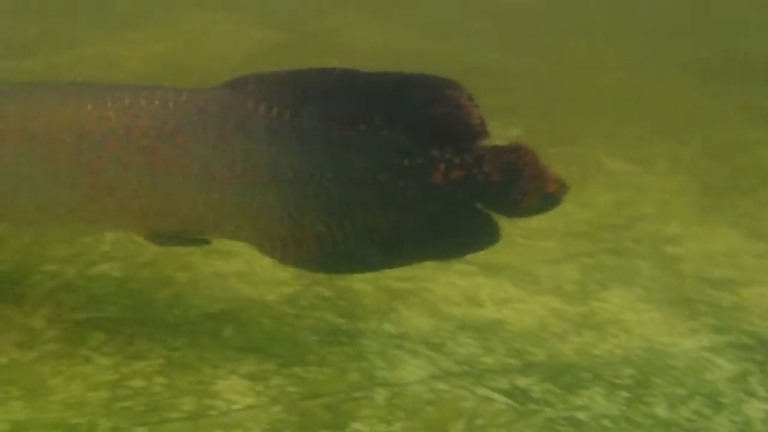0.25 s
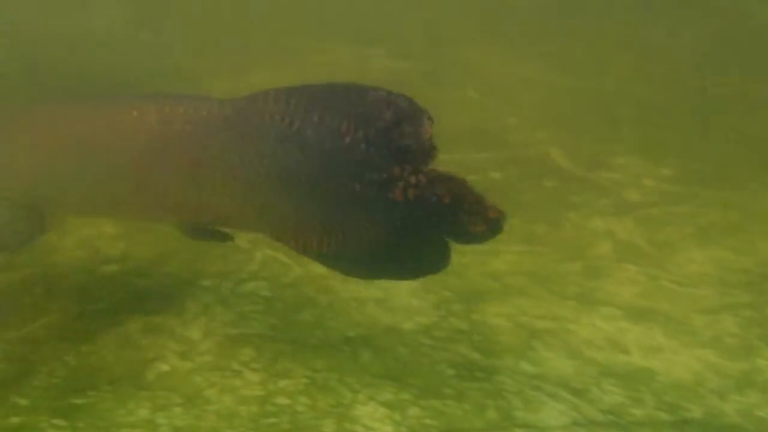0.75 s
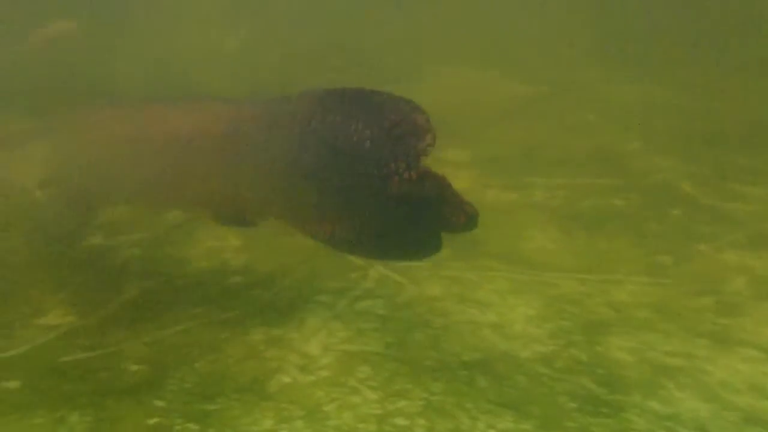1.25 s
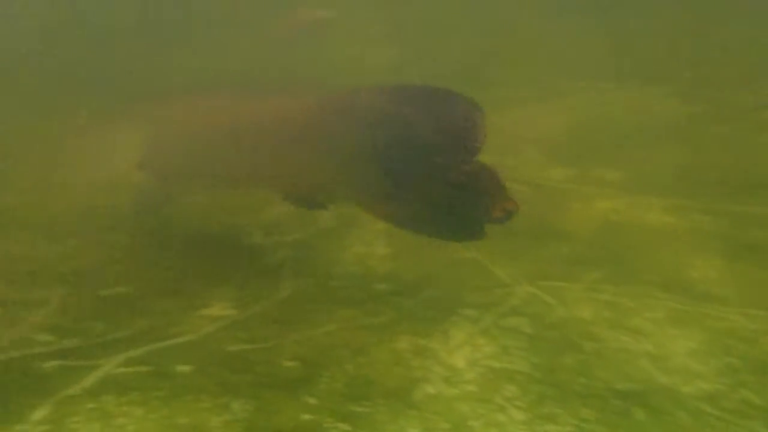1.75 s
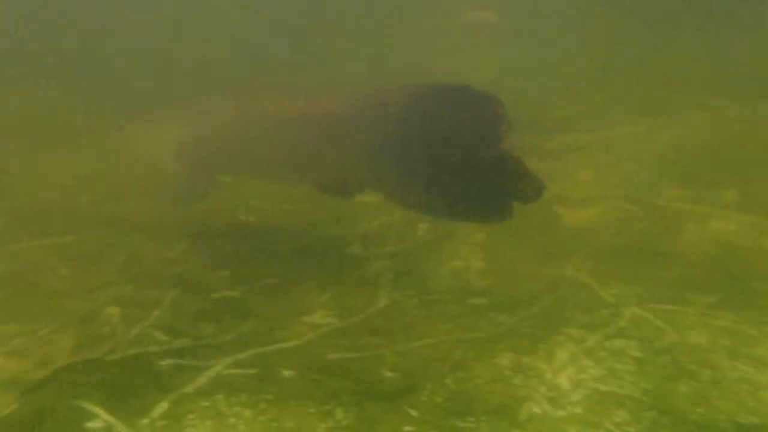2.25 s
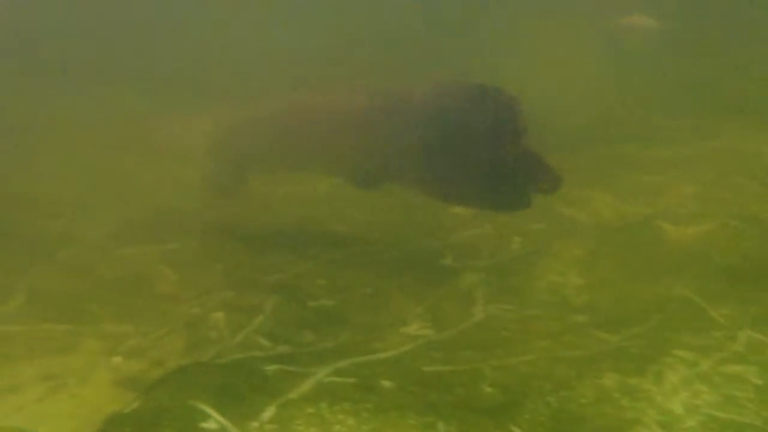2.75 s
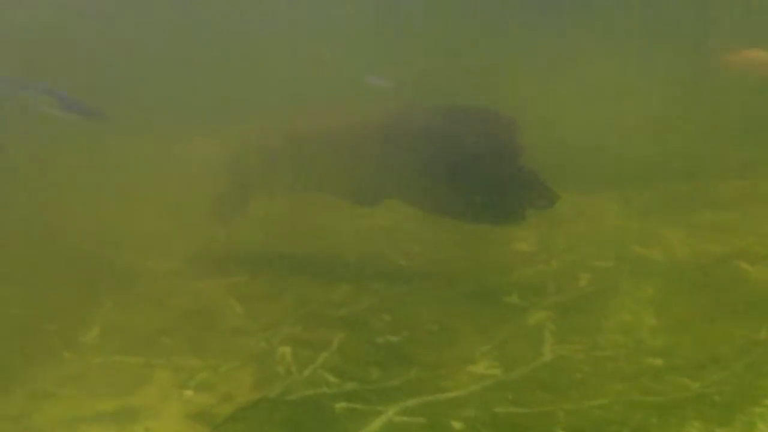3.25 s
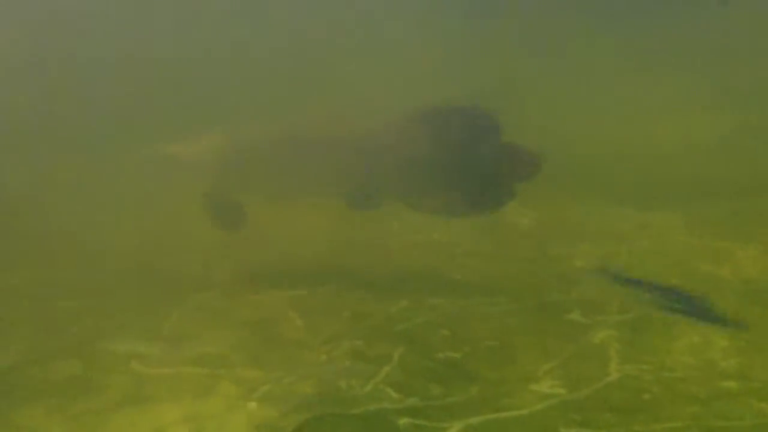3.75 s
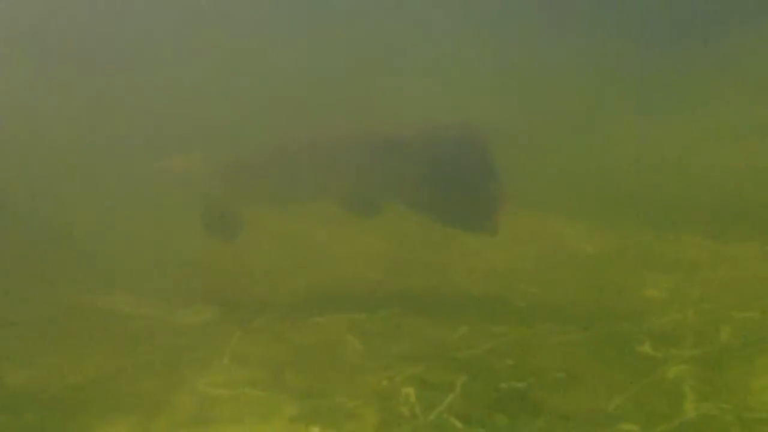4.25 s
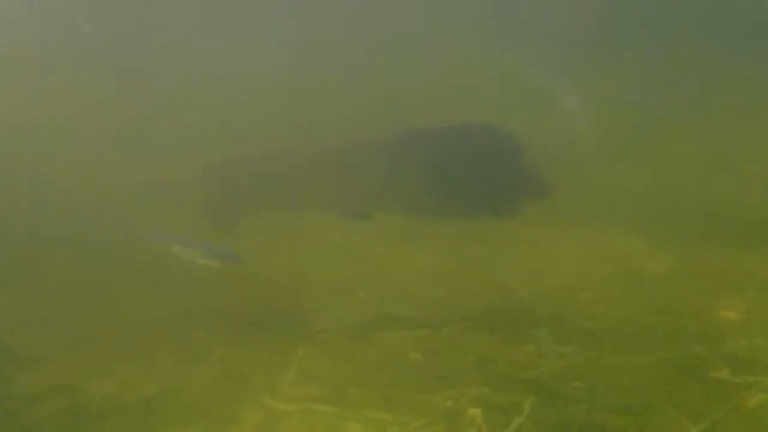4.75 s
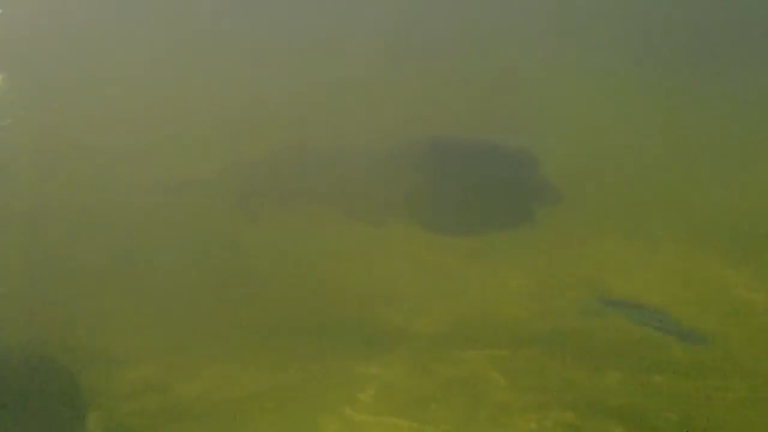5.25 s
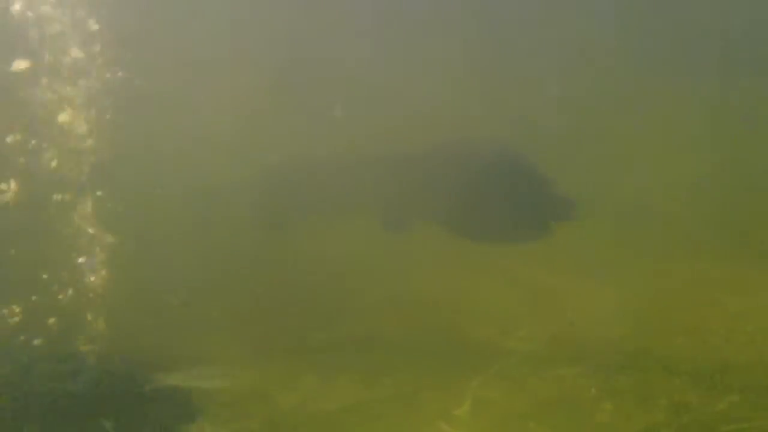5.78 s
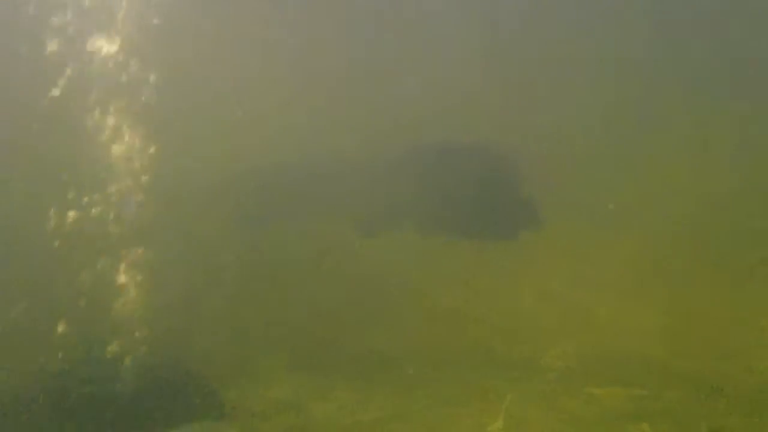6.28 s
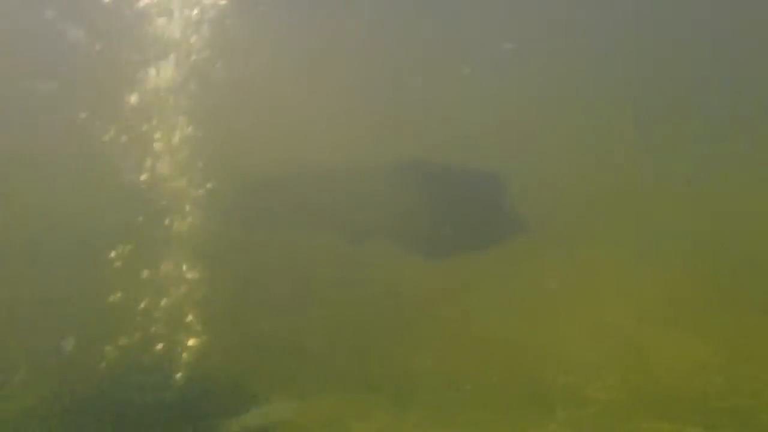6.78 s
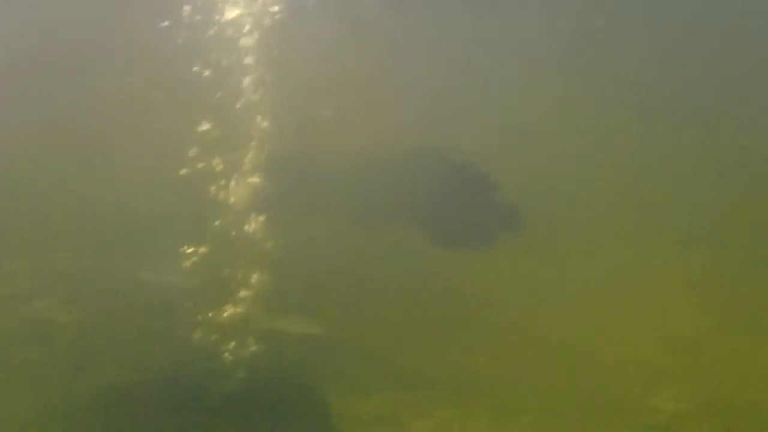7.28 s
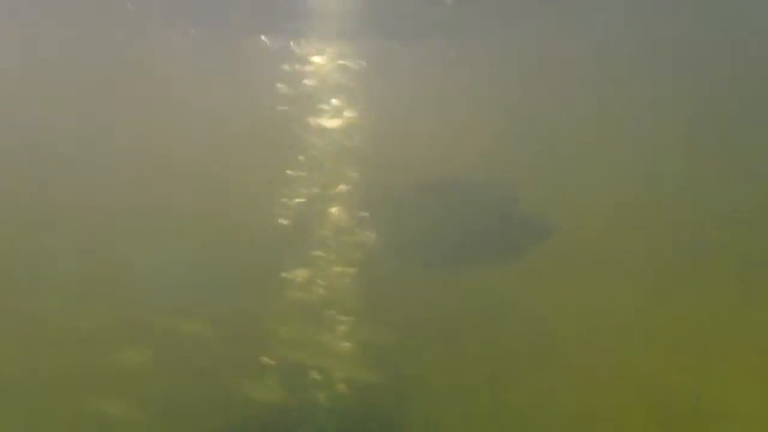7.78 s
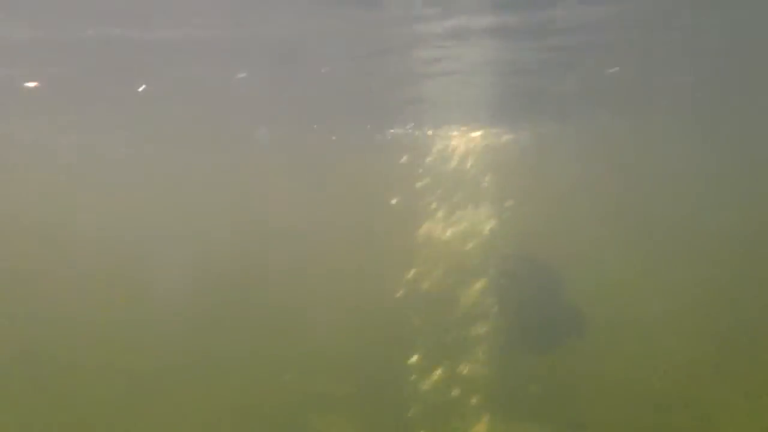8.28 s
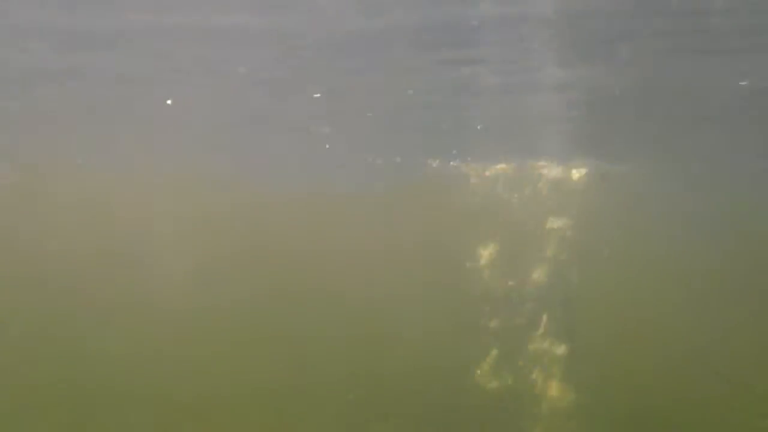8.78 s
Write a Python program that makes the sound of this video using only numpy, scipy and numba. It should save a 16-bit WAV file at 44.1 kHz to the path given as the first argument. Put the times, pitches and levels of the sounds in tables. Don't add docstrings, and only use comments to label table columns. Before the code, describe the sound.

Rapid glassy bubbling and popping heard inside a submerged housing, with a short opening hum, soft rumbling flow and occasional hard handling knocks.

```python
import sys
import numpy as np
from scipy import signal
from scipy.fft import rfft, irfft, next_fast_len
from scipy.io import wavfile
from scipy.ndimage import uniform_filter1d
from numba import njit

SR = 44100
rng = np.random.default_rng(int(sys.argv[2]) if len(sys.argv) > 2 else 0)


def boost(x):
    u = np.asarray(x, float) / 20
    return 10 ** u


def to_wav(sig):
    pcm = np.clip(np.atleast_2d(sig), -1, 1) * 32767
    pcm = np.round(pcm).astype(np.int16)
    wavfile.write(sys.argv[1], SR, pcm.T)


N = 398223
T = np.arange(N) / SR

# (centre [Hz], width [Hz], lift [dB])
SHELL_MODES = [(1191.6, 41.7, 19), (1392, 117, 13.5), (1584, 135, 12), (2070, 36, 8), (2400, 86, 5.5),
               (3700, 650, 5), (5890, 450, 16)]
# (pitch [Hz], level [dB])
BUBBLE_SIZES = [(800, -35), (1000, -16), (1130, -12), (1400, -4.5), (1700, -8), (2000, -15), (3000, -20.5),
                (5000, -29), (6500, -35), (7500, -50)]
# (time [s], bubble stream level [dB], rumble level [dB])
DRIFT = [(0.0, -19.5, -14), (0.63, -21, -25), (1.05, -21, -27.5), (1.41, -21.5, -25.5), (3.32, -20, -26.5),
         (3.67, -22.5, -29), (4.2, -21.5, -26), (4.55, -25.5, -29), (5.53, -21.5, -28),
         (8.78, -25.5, -24.5), (9.03, -23, -16)]
# (frequency [Hz], density [dB per Hz])
FLOW_SPECTRUM = [(15, -1), (25, 3), (150, 1.5), (230, -11), (400, -22.5), (700, -26.5), (1000, -27),
                 (2500, -38), (6000, -41.5), (7500, -48), (13000, -55)]
# (start [s], end [s], level [dB])
TOUCHES = [
    (0, 0.922, -22),
    (3.84, 3.98, -26),
    (4.12, 4.44, -27),
]
# (multiple of the root [1], level [dB])
HUM_OVERTONES = [(1, 2), (2, -8.5), (3, -10.5), (4, -14), (7, -24.5)]
# (frequency [Hz], level [dB rms])
WHINE_TONES = [(8031, -76), (8091, -72), (8152, -63), (8212, -66), (8273, -74), (8333, -76)]
# (time [s], level [dB], pitch [Hz], length [s])
BIG_BURSTS = [(0.013, -8, 1207, 0.01), (0.087, -17.5, 1230, 0.0081), (0.488, -15, 1383, 0.00286),
              (0.566, -21, 1225, 0.006), (0.727, -8, 1170, 0.0068), (0.748, -13.5, 1164, 0.007),
              (1.059, -19, 1249, 0.016), (1.371, -13, 1298, 0.0089), (1.402, -10.5, 1213, 0.0089),
              (1.647, -16.5, 1230, 0.008), (1.863, -8, 1182, 0.02), (2.699, -11.5, 1315, 0.024),
              (2.992, -19, 1044, 0.008), (3.214, -8.5, 1186, 0.015), (3.501, -2.5, 1170, 0.016),
              (3.55, -11.5, 1123, 0.014), (3.633, -5.5, 1184, 0.0065), (4.109, -11.5, 1200, 0.007),
              (6.023, -11, 1156, 0.005), (6.104, -2, 1195, 0.024), (6.279, -12, 1160, 0.007),
              (6.333, -11, 1130, 0.0039), (6.771, -15, 1236, 0.018), (6.938, -7, 1170, 0.0067),
              (6.992, -16.5, 1208, 0.011), (7.092, -11.5, 1224, 0.013), (7.196, -10, 1154, 0.017),
              (7.795, -8, 1188, 0.01), (8.184, -10, 1185, 0.01), (8.622, -12.5, 1193, 0.009)]
# (time [s], level [dB], pitch [Hz])
MIDDLE_BURSTS = [(0.871, -16, 1386), (0.889, -15.5, 1484), (1.444, -10, 1657), (1.58, -16, 1490),
                 (1.74, -14, 1302), (1.976, -18, 1636), (2.072, -7, 1625), (2.176, -9.5, 1424),
                 (2.388, -11, 1625), (8.863, -14.5, 1540), (2.57, -14.5, 1630), (2.662, -9.5, 1340),
                 (2.718, -9.5, 1490), (2.824, -12.5, 1610), (2.939, -13, 1647), (3.176, -11, 1560),
                 (3.252, -13, 1610), (4.4, -13, 1386), (4.787, -10.5, 1514), (4.802, -9, 1530),
                 (4.895, -10.5, 1760), (5.238, -12.5, 1670), (5.486, -12, 1350), (6.363, -10.5, 1328),
                 (6.583, -10.5, 1362), (7.405, -11, 1520), (7.69, -9.5, 1387), (8.113, -12.5, 1440),
                 (8.465, -15, 1440), (8.651, -10.5, 1360)]
# (time [s], level [dB], pitch [Hz])
SMALL_BURSTS = [(0.183, -20, 2070), (0.228, -27, 2400), (0.258, -22, 2170), (1.145, -17, 2120),
                (1.266, -15.5, 2020), (1.268, -21, 2850), (1.682, -17.5, 2400), (1.925, -28.5, 2770),
                (2.107, -16, 2070), (2.192, -22, 2050), (2.724, -18.5, 2100), (3.097, -20, 2020),
                (3.226, -14, 1884), (3.643, -25, 2310), (3.92, -21.5, 2720), (4.053, -21, 2400),
                (4.082, -12.5, 2535), (4.132, -25, 2050), (4.349, -23, 2180), (4.455, -28, 1890),
                (4.966, -20.5, 2190), (5.23, -29.5, 2770), (5.452, -30.5, 2310), (5.651, -23, 2100),
                (6.535, -28, 2720), (6.62, -14, 1760), (6.783, -23.5, 2420), (7.296, -26, 2150),
                (7.689, -23.5, 2400), (7.974, -20, 1770)]
# (time [s], level [dB], pitch [Hz])
TINY_BURSTS = [(0.544, -29, 3950), (1.014, -35, 6350), (1.749, -34.5, 4560), (1.852, -19.5, 6180),
               (2.108, -24, 5960), (2.113, -26.5, 3200), (2.255, -24, 3300), (2.355, -30, 3960),
               (2.519, -27.5, 2970), (3.995, -28, 6380), (4.033, -27, 4050), (4.439, -27.5, 5900),
               (4.632, -29, 6220), (4.64, -28.5, 4200), (4.987, -29, 6080), (5.058, -28.5, 3340),
               (5.199, -30.5, 5600), (5.323, -24.5, 4770), (5.876, -25.5, 3620), (5.974, -25, 3370),
               (6.197, -25, 3400), (6.709, -27, 3430), (6.904, -32, 6040), (7.186, -31, 3360),
               (7.367, -28, 3480), (7.848, -27, 3680), (8.417, -21, 4720), (8.46, -24, 6110),
               (8.484, -28, 3450), (8.857, -19.5, 3610)]
# (time [s], ring level [dB], thud level [dB], crack level [dB])
TICKS = [
    (.9358, 5, -5, -15),
    (1.5805, -5, -26, -34),
    (4.302, -2, -30, -30),
    (7.6006, 6, -3, -1),
    (8.9194, -4, 3, -18),
]
# (time [s], peak level [dB], pitch [Hz])
BUMPS = [(1.132, -21, 202), (2.056, -35, 313), (6.478, -32, 417), (2.38, -28, 264), (2.942, -28, 293),
         (3.37, -31, 301), (3.819, -23.5, 300), (4.738, -28, 690), (5.157, -19, 328), (5.191, -22.5, 318),
         (5.611, -27, 200), (5.646, -25, 261), (5.882, -34, 301), (5.967, -24.5, 272), (6.207, -30, 310),
         (6.348, -32, 299), (7.001, -27, 297), (7.338, -29, 242), (6.537, -27, 300), (7.528, -28.5, 378),
         (7.552, -22.5, 207), (7.81, -26.5, 320), (7.868, -21, 258), (7.992, -35, 355), (8.627, -35, 296),
         (8.684, -31, 285), (8.729, -25, 304), (8.773, -20.5, 340), (8.929, -18, 323), (8.975, -26, 200)]
# (start [s], end [s], level [dB])
RUBS = [
    (5.141, 5.31, -35),
    (7.3, 7.58, -36),
    (8.0, 8.25, -35),
    (8.65, 8.81, -28),
    (2.8, 2.9, -40),
]
# (time [s], gain [dB])
DUCKS = [(0.037, -7.5), (0.113, -7.5), (.3, -6.5), (0.359, -9), (.45, -8.5), (0.619, -8.5), (0.748, -11),
         (0.819, -10), (0.892, -7.5), (0.938, -14.5), (1.29, -8.5), (1.88, -5.5), (2.47, -8.5), (2.722, -6),
         (2.971, -9), (3.251, -6.5), (4.116, -4), (4.152, -5), (4.307, -7.5), (4.412, -2), (4.902, -7.5),
         (5.592, -3.5), (6.117, -3), (6.339, -4), (6.592, -11.5), (6.805, -0.5), (7.128, -6), (7.231, -6),
         (7.602, -13), (8.884, -8.5)]


def level(x, db):
    return x * boost(db) / np.sqrt(np.mean(x ** 2))


def curve(points, hz):
    f, db = np.transpose(points)
    return np.interp(np.log(hz), np.log(f), db)


def resonance(hz, centre_hz, width):
    return 1 / (1 + 1j * (hz ** 2 - centre_hz ** 2) / (hz * width))


def filtered(x, response):
    size = next_fast_len(N + SR)
    hz = np.maximum(np.arange(size // 2 + 1) * SR / size, 1.)
    return irfft(rfft(x, size) * response(hz), size)[:N]


def walk(rate):
    hold = int(SR / rate)
    steps = np.repeat(rng.standard_normal(N // hold + 1), hold)
    return 1.3 * uniform_filter1d(uniform_filter1d(steps, hold), hold)[:N]


@njit
def ring(s, hz, size, t60, rise, glide):
    out = np.zeros(N)
    for k in range(len(s)):
        start, phase = int(s[k] * SR), 0.
        for i in range(min(int(t60[k] * SR), N - start)):
            t = i / SR
            phase += 2 * np.pi * hz[k] * (1 + glide * t / t60[k]) / SR
            envelope = (1 - np.exp(-t / rise)) * np.exp(-6.907755 * t / t60[k])
            out[start + i] += size[k] * envelope * np.sin(phase)
    return out


def housing(hz):
    return 1 + sum((boost(db) - 1) * resonance(hz, f, w) for f, w, db in SHELL_MODES)


def before_gain(s, db):
    return db - np.interp(s, T, limiter_db())


def bubbles(s, db, hz, length, t60, rise, spread, fade_db, count):
    late, detune = np.moveaxis(rng.random((len(s), count, 2)), 2, 0)
    order = np.arange(count)
    follows = order > 0
    start = s[:, None] + np.clip(length, 0, .06)[:, None] * (order + late * follows) / count
    pitch = hz[:, None] * (1 + spread * (2 * detune - 1) * follows)
    fade = fade_db * np.sqrt(order / count)
    size = boost(before_gain(s + length / 4, db)[:, None] + fade) / np.abs(housing(hz))[:, None]
    return ring(start.ravel(), pitch.ravel(), size.ravel(), t60 + 0 * pitch.ravel(), rise, 0.)


def stream(count, scatter_db, cycles):
    u = rng.random((count, 4)).T
    clump_s = np.round(u[0] * 360) / 40
    s = np.clip(clump_s + .03 * (u[3] - .5), 0, 9.02)
    hz = 800 * (7500 / 800) ** u[1]
    db = curve(BUBBLE_SIZES, hz) - scatter_db * np.log(u[2] + 0.00067)
    return level(ring(s, hz, boost(db), 0.025 + cycles / hz, 0.0003, 0.0033), 0)


def clusters(count, scatter_db):
    u = rng.random((count, 3)).T
    s = 9 * u[0]
    hz = 1800 * (7000 / 1800) ** u[1]
    db = curve(BUBBLE_SIZES, hz) + 20 * np.log10(np.abs(housing(hz))) + scatter_db * u[2]
    return bubbles(s, db, hz, .035 + 0 * s, 0.013, 0.00015, 0.14, -23, count=12)


def flow_colour(hz):
    return boost(curve(FLOW_SPECTRUM, hz))


def rumble():
    noise = filtered(rng.standard_normal(N), lambda hz: flow_colour(hz) / (1 + (hz / 1500) ** 4))
    flow = noise * boost(1.2 * walk(14))
    sway = filtered(flow, lambda hz: 1 / (1 + (hz / 65) ** 8))
    return level(flow - sway, -5.0) + level(sway, -4.5)


def hiss(air, fizz):
    sparkle = filtered(air, lambda hz: 1 / (1 + (3200 / hz) ** 8))
    flare = level(uniform_filter1d(np.abs(sparkle), 300), 0)
    total, top_hz = 0, 14350
    for centre in 2000 * 2 ** np.arange(0, 3.5, .5):
        band = filtered(rng.standard_normal(N),
                        lambda hz: flow_colour(hz) * resonance(hz, centre, centre / 3.6) * (hz < top_hz))
        total = total + band * (boost(3.3 * walk(30)) + fizz * flare)
    return level(total, -45.5)


def contact():
    press_s, let_go_s = 0.14, .02
    total = 0
    for start, end, db in TOUCHES:
        press = (T - start) / press_s + .5
        let_go = (end - T) / let_go_s + .5
        total = total + boost(db) * np.clip(np.minimum(press, let_go), 0, 1)
    return total


def hum():
    root_hz = 49.1 * (1 + .02 * walk(10))
    phase = 2 * np.pi * np.cumsum(root_hz) / SR
    tone = sum(boost(db + 1.0 * k ** 0.81 * walk(48)) * np.sin(k * phase + k) for k, db in HUM_OVERTONES)
    return level(tone, 0) * contact()


def whine():
    return sum(boost(db + 1.5) * np.sin(2 * np.pi * hz * T) for hz, db in WHINE_TONES)


def big_bursts(count):
    u = rng.random((count, 3)).T
    low_hz, high_hz = 1060, 1785
    lesser = np.array([9 * u[0], -15 - 11 * u[1], low_hz * (high_hz / low_hz) ** u[2]])
    brief = np.hstack([np.transpose(MIDDLE_BURSTS), lesser])
    brief = np.vstack([brief, .006 + 0 * brief[0]])
    s, db, hz, length = np.hstack([np.transpose(BIG_BURSTS), brief])
    return bubbles(s, db + 5, hz, 1.4 * length, 0.038, 0.00049, 0.054, -8.5, count=3)


def small_bursts():
    s, db, hz = np.transpose(SMALL_BURSTS + TINY_BURSTS)
    return bubbles(s, db + 6.5, hz, .035 + 0 * s, 0.018, 0.00027, 0.1, -19.5, count=12)


def limiter_db():
    knee_db, bite_per_db, late_s = -13, 0.62, 0.018
    recover_db_s, bite_s = 71, 0.0011
    gain = np.zeros(N)
    rings = [(s + late_s, bite_per_db * (knee_db - db)) for s, db, *_ in BIG_BURSTS + MIDDLE_BURSTS]
    for s, db in DUCKS + rings:
        span = slice(int(s * SR), int(s * SR) + SR // 2)
        gain[span] = np.minimum(gain[span], db + recover_db_s * (T[span] - s))
    return uniform_filter1d(gain, max(int(bite_s * SR), 1))


def ticks():
    s, db, thud_db, crack_db = np.transpose(TICKS)
    body = ring(s, 1380 + 0 * s, boost(db), .015 + 0 * s, .00025, 0.)
    thud = ring(s, 700 + 0 * s, boost(thud_db), .004 + 0 * s, .0002, 0.)
    crack = np.zeros(N)
    crack[(s * SR).astype(int) + 24] = boost(crack_db)
    return body + thud + filtered(crack, lambda hz: resonance(hz, 11000, 14000))


def bumps():
    s, db, hz = np.transpose(BUMPS)
    size = boost(before_gain(s, db) + 10)
    knock = ring(s, hz, size, 0.014 + 0 * s, 0.00009, -0.13)
    push = ring(s, 70 + 0 * s, size * boost(-2.5), 0.044 + 0 * s, 0.00032, 0.)
    return knock + push


def rubs():
    u = rng.random((len(RUBS), 32, 3))
    start, end, db = np.transpose(RUBS)[:, :, None]
    s = start + (end - start) * u[:, :, 0]
    hz = 220 * 2.87 ** u[:, :, 1]
    size = boost(db + 10 * u[:, :, 2]) * 300 / hz
    return ring(s.ravel(), hz.ravel(), size.ravel(), 7 / hz.ravel(), 0.00029, 0.)


def scene():
    s, *columns = np.transpose(DRIFT)
    stream_db, rumble_db = (np.interp(T, s, c) for c in columns)
    far = stream(count=11000, scatter_db=2.5, cycles=44.0) * boost(stream_db - 13.5)
    near = clusters(count=380, scatter_db=18) * boost(-18.5)
    air = filtered(far + near + big_bursts(count=80) + small_bursts(), housing)
    shake = rumble() * boost(np.minimum(rumble_db, -24)) + hum()
    shake = shake * boost(-.8 * limiter_db())
    handling = ticks() + bumps() + rubs()
    return (air + shake + hiss(air, fizz=.25) + whine() + handling)[None]


def roll_off(x):
    return signal.sosfilt(signal.butter(12, 15500, fs=SR, output="sos"), x)


def record(dry):
    ceiling = .69
    x = dry * boost(limiter_db() + 0.04) / ceiling
    mix = ceiling * x / (1 + x ** 8) ** (1 / 8)
    return roll_off(mix)


dry = scene()
out = record(dry)
to_wav(out)
```